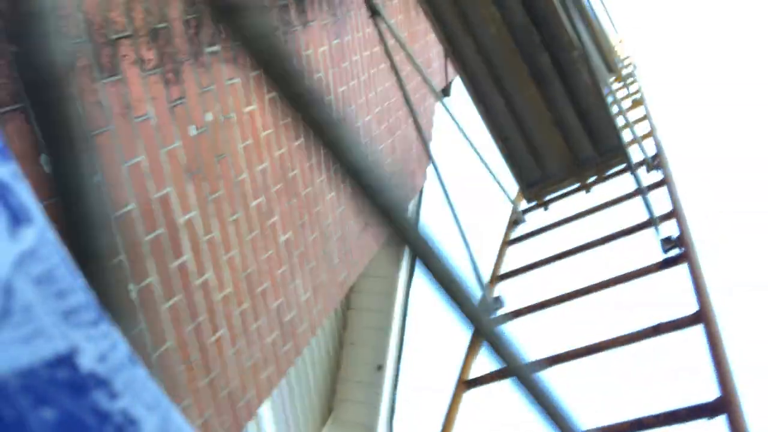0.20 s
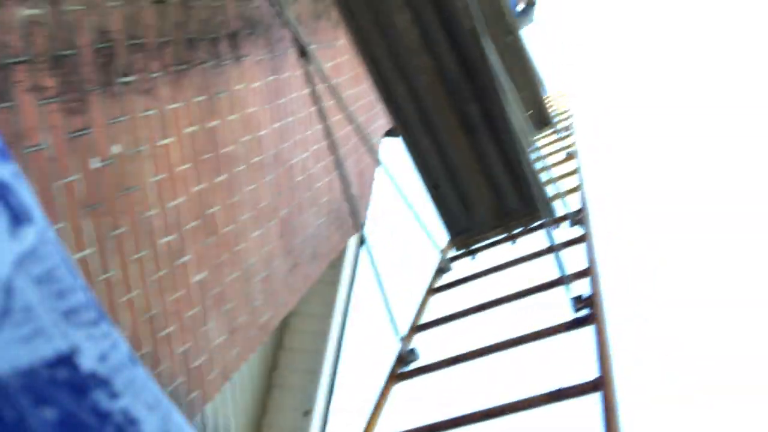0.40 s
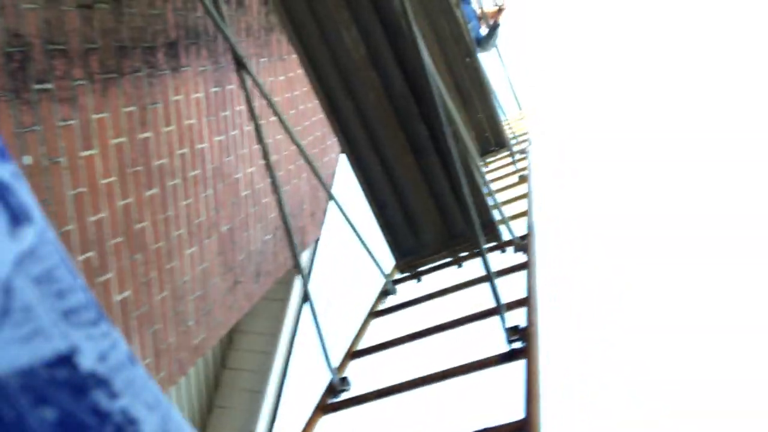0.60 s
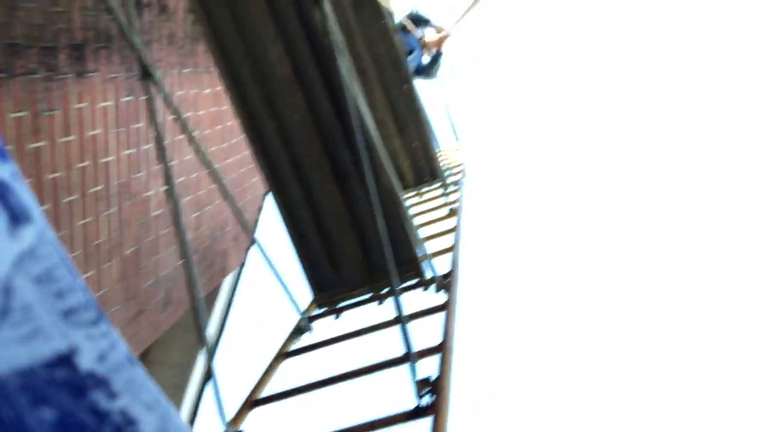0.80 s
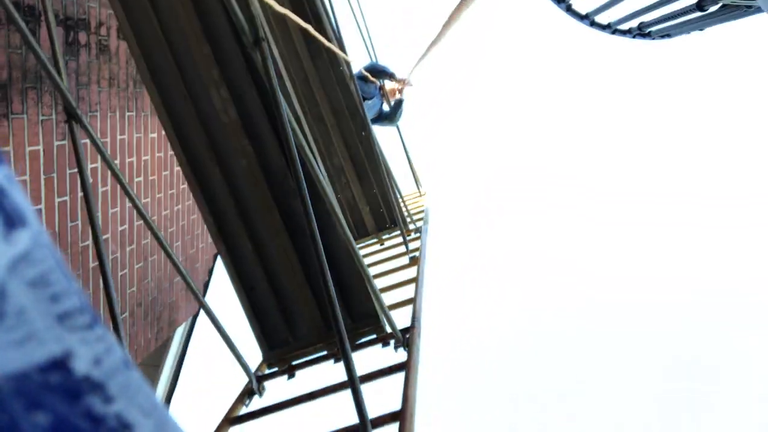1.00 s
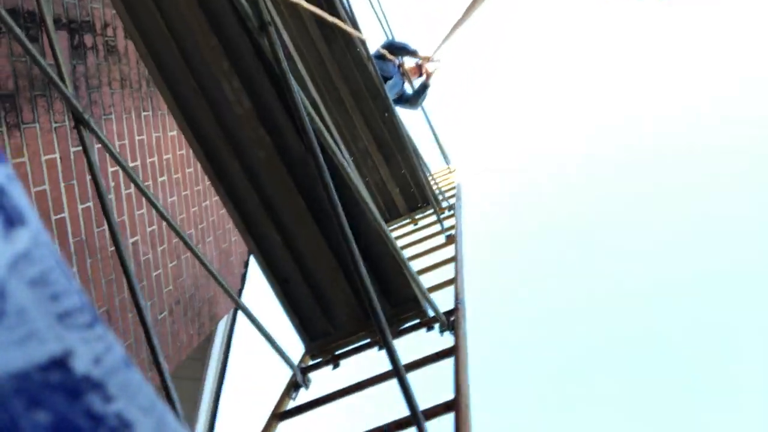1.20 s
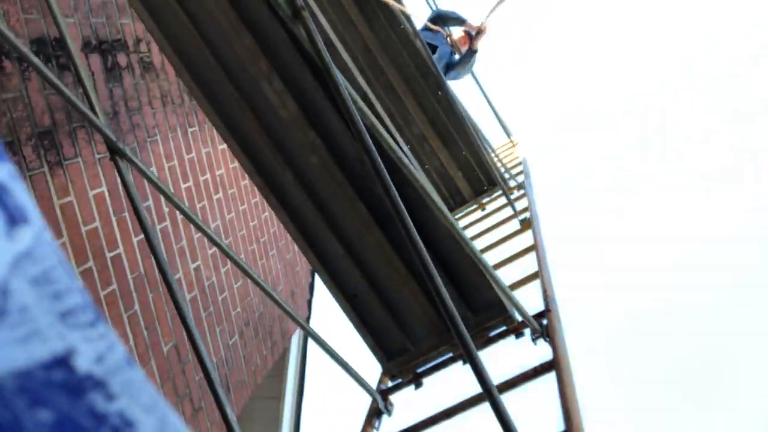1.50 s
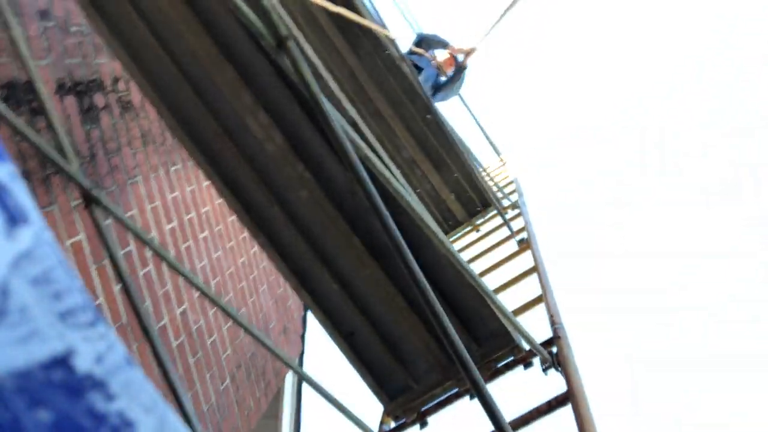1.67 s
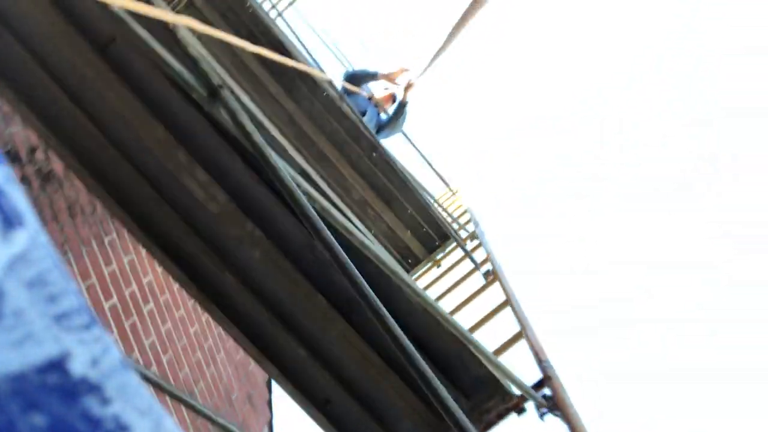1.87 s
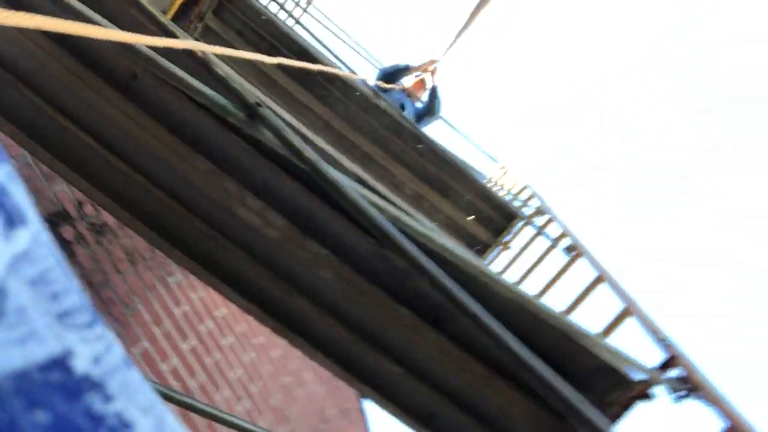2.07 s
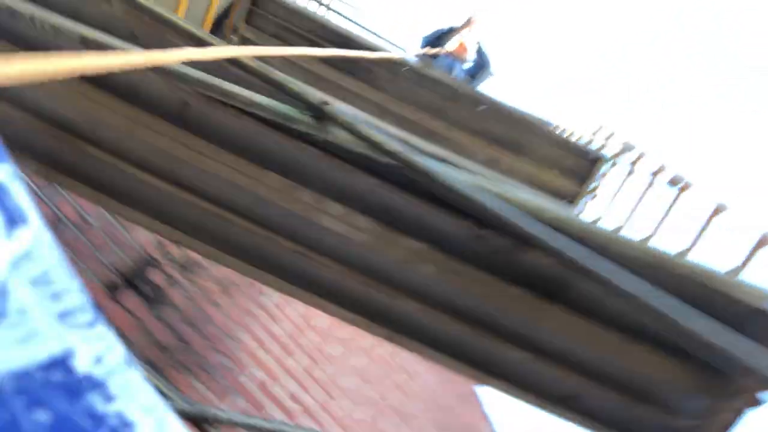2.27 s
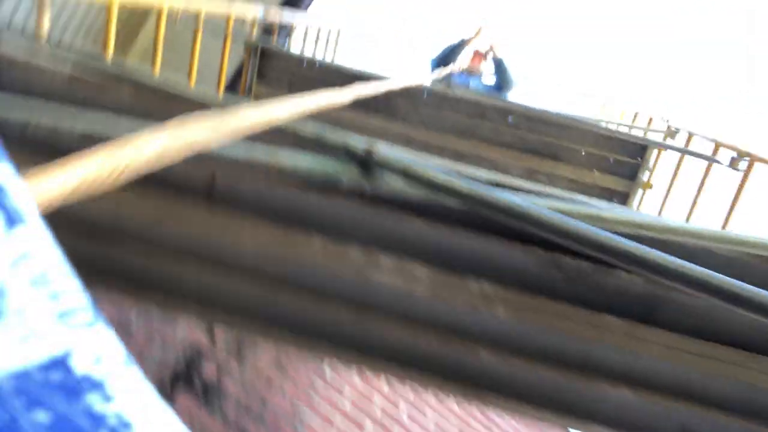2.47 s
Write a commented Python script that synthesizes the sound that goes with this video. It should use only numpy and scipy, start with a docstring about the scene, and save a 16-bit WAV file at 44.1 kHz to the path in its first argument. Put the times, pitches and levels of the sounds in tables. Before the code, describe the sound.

A bucket of tools takes one hard hollow knock, then light clacks and scrapes as it is hauled up

```python
"""Inside a bucket of tools, hauled up on a rope beside a brick wall and a steel scaffold.
The bucket takes one hard knock and a few light ones, and a loose tool knocks: blows excite decaying modes.
The tool also drags and cloth rustles, with a short scrape and narrow ringing bands: filtered random grains.
The swinging load thuds softly and distant traffic rumbles below: both are noise shaped in spectrum."""
import sys
import numpy as np
from scipy import signal
from scipy.fft import rfft, irfft
from scipy.io import wavfile

SR = 44100
rng = np.random.default_rng(int(sys.argv[2]) if len(sys.argv) > 2 else 0)


def persist_wave(psi):
    """Save psi, clipped to +-1, as 16-bit WAV."""
    counts = np.round(np.clip(psi, -1, 1) * 32767).astype(np.int16)
    wavfile.write(sys.argv[1], SR, np.atleast_2d(counts).T)


N = 114660  # samples

# Street rumble and hiss, relative spectrum: (f/Hz, level/dB)
STREET_SPECTRUM = [(18, -33), (30, -5.5), (165, -8), (295, -7), (355, -10.5), (632, -13), (801, -10),
                   (962, -15), (1670, -24), (3220, -30), (3670, -30.5), (5900, -33.5), (16000, -39.5)]
# Low thudding of the swinging load, before its flutter: (t/s, level/dB)
SWAY_LEVEL = [(0, -65.5), (.3, -54), (.46, -71), (.62, -61), (.8, -56), (.95, -56), (1.2, -56), (1.4, -55),
              (1.55, -57.5), (1.67, -55), (1.73, -44), (1.83, -42.5), (1.9, -52.5), (2.0, -52.5),
              (2.16, -58), (2.23, -52), (2.33, -51), (2.45, -55.5), (2.6, -59)]
# Relative spectrum of the thudding: (f/Hz, level/dB)
SWAY_SPECTRUM = [(18, -56), (30, -64.5), (43, 7), (86, 2.5), (200, -6.5), (322, -21), (400, -14.5),
                 (520, -37.5), (880, -120)]
# Swishes, with a short scrape and narrow ringing bands among them, level before the swell:
# (centre t/s, half-length/s, level/dB, centre f/Hz, width/octaves)
SWISHES = [(0.44, 0.037, -62.5, 3400, 2), (0.43, .04, -72, 12000, 0.71), (.545, 0.034, -64.5, 5000, 1.1),
           (0.582, 0.027, -57, 7500, 4.3), (0.62, 0.068, -61.5, 11200, 7), (0.72, 0.037, -69, 4200, 1.7),
           (0.76, 0.095, -67, 13000, 4.4), (0.935, 0.12, -79, 5000, 1.5), (1.014, 0.042, -61, 6200, 1.6),
           (1.021, 0.019, -67, 6200, 0.088), (1.018, 0.022, -64.5, 12000, 0.25),
           (1.018, .014, -70, 15000, .12), (1.789, 0.042, -65, 5700, 0.74), (1.895, 0.088, -65, 10000, 6.4),
           (2.2, 0.1, -67, 5500, 2.1), (2.06, 0.11, -58, 2000, 1.68), (0.38, 0.19, -55.5, 358, 0.23),
           (0.58, .022, -52.5, 590, 0.091), (2.058, 0.019, -48.5, 1350, 0.41),
           (0.92, 0.013, -60.5, 3200, .7)]
# Things shifting and dragging in the bucket: (t/s, level/dB)
DRAG_LEVEL = [(0.0, -71), (0.22, -59), (0.36, -54), (0.58, -62), (1.05, -59.5), (1.22, -66), (1.53, -78.5),
              (1.74, -52), (1.85, -56), (1.93, -52), (2.01, -57.5), (2.1, -56), (2.2, -55.5), (2.36, -71),
              (2.52, -87), (2.6, -70)]
# Relative spectrum of the rubbing: (f/Hz, level/dB)
DRAG_SPECTRUM = [(150, -56), (250, -3.5), (340, -2), (538, -0.5), (561, -5.5), (877, -4), (1140, -5),
                 (7000, -34.5), (9100, -48), (15400, -120)]
# Bright ticks of hard contact, level before the puff and snap offsets: (t/s, level/dB)
TICKS = [(0.2039, -34.5), (0.208, -45), (0.334, -54.5), (0.4259, -60), (0.4732, -49), (0.5399, -61),
         (0.7669, -81), (0.7814, -47), (1.0357, -52), (1.0899, -43.5), (1.148, -48), (1.1817, -53),
         (1.6753, -39), (1.6857, -40), (1.912, -48.5), (2.21, -57), (2.397, -58), (2.436, -52),
         (2.5202, -54)]
# Knocks of the loose tool, nominal time and level before the touch offsets:
# (t/s, level/dB, bass/dB, treble/dB, top/dB, share of the free ring time)
TOOL_KNOCKS = [(0.3329, -42.5, -7, 3.5, 5, 0.49), (0.395, -44.5, -15, 4, 3, 0.62),
               (0.4281, -44.5, 0, 0, 3, 0.91), (0.636, -44, 2, 0.5, -2, 0.43),
               (0.9796, -44.5, -1, -2.5, -4, 0.66), (1.0559, -43.5, -0.5, -5, -1, 0.61),
               (1.0915, -36, 3, 3.5, -3, 0.5), (1.1435, -33.5, 4, -5.5, -8, 0.43),
               (1.162, -46, -3, -18, -10, 0.67), (1.185, -39.5, -2.5, -5, -15, 0.89),
               (1.3836, -44.5, 1.5, 3, -10, 0.65), (1.446, -46, -2, -3, -16, 0.84),
               (1.4852, -41.5, -2, -1, -9, 0.74), (1.5105, -48, 7.5, 3, -9, 0.63),
               (1.6333, -41, 1, 1.5, 1, 1.14), (1.6772, -34, -13, 6, 8, 0.47),
               (1.6825, -26, 4.5, 11.5, 13, 0.48), (1.6915, -31.5, 3.5, -12, -12, 0.58),
               (1.886, -32.5, -10, -12, 0, 0.29), (1.9155, -32, -2, -6, -2, 0.58),
               (1.922, -31.5, -11, -13, -2, 0.82), (1.944, -41, -13, 2.5, -2, 0.66),
               (1.9851, -33, -6, -7, -4, 0.73), (2.088, -45, -23, -15, -10, 0.78),
               (2.139, -43, -6, -3.5, 0, 0.93), (2.1668, -42.5, -9, -6, -6, 0.97),
               (2.2144, -42.5, -2, -1, -1, 0.61), (2.2258, -33, 3.5, 7, 4.5, 0.61),
               (2.3065, -42, 9.5, -6, -10, 0.78), (2.3984, -38.5, -6, 5, -1, 0.65),
               (2.4343, -36.5, -2.5, -3.5, -1.5, 1.015), (2.5223, -43.5, 6, 3.5, -4.5, 0.73),
               (2.583, -43.5, -1, 3.5, 1.5, 0.92)]
# Modes of the tool before detuning: (f/Hz, level/dB, T60/s)
TOOL_MODES = [(380, -6, 0.033), (545.3, -4.5, 0.091), (718, -15.5, 0.099), (960, -6, 0.077),
              (1197, -7.5, 0.1), (1632, -8, .07), (1795, 0, 0.024), (2143, 0, 0.022), (2284, -7.5, 0.052),
              (2810, -20.5, 0.081), (2978, -32.5, 0.12), (3680, -14.5, 0.042), (4670, -38.5, 0.005)]
# Unpitched part of a tool knock, relative spectrum: (f/Hz, level/dB)
CLATTER_SPECTRUM = [(180, -45), (300, -17.5), (529, 4.5), (828, -16), (1200, 0), (2340, -15), (7000, -51.5),
                    (9100, -76), (15400, -120)]
# The load thumping on the bucket floor: (t/s, level/dB, bass/dB)
THUMPS = [(.2060, -17.5, -7.5), (0.2117, -22, 5.5), (0.223, -15.5, -2.5), (0.231, -27, 2),
          (0.741, -41, -25)]
# Modes of the bucket floor: (f/Hz, level/dB, T60/s)
FLOOR_MODES = [(61, -4, 0.11), (94.3, 0.5, 0.097), (135.5, -4.5, 0.097), (194.5, -4, 0.092),
               (249.2, -3, 0.099), (315, -32.5, 0.082), (426, -8, 0.056)]
# Knocks choked at once by what presses on the wall: (t/s, length/s, peak level/dB, f/Hz)
CHOKED_KNOCKS = [(.2060, .0056, -6, 735), (1.1468, .005, -31.5, 1050)]
# Knocks on the bucket wall, the hard one led by a faint low onset:
# (t/s, level/dB, bass/dB, treble/dB, top/dB, share of the free ring time)
BUCKET_KNOCKS = [(0.1968, -34, 13, -16, -12, 1.1), (.2030, -23, -9, 14.5, 14, 0.69),
                 (0.2058, -17, -1.5, 16, 7, 0.56), (.2190, -17, -2, -11, -7.5, 1.18),
                 (0.4722, -45.5, -34, 7, 10, 1), (0.5461, -51.5, -3, 1, 8, 1.2),
                 (.7370, -38.5, -1.5, -30, -13, 1.55), (0.7846, -58.5, -22, 9, 22.5, 0.8),
                 (2.446, -39.5, -23, -8, -9, 0.8)]
# Modes of the bucket wall: (f/Hz, level/dB, T60/s)
BUCKET_MODES = [(636, -8, 0.063), (716, 0, 0.046), (1070, -18.5, 0.037), (1138, 1.5, 0.096),
                (1217, -13.5, 0.19), (1458, -12, 0.058), (2323, -10.5, 0.019), (2924, -21, 0.045),
                (3845, -26, 0.089), (4860, -32, .08), (5020, -27, 0.062), (7270, -35.5, 0.05)]
# Loose contents jolted by a bucket knock, relative spectrum: (f/Hz, level/dB)
CRASH_SPECTRUM = [(900, -3.5), (1500, 6), (2400, -6), (3800, -9.5), (5500, -18.5), (9000, -24),
                  (16000, -26.5)]

STREET_DB, HUM_HZ, HUM_T60_S, HUM_DB = -59.5, 150.9, 0.66, -66.5
TAIL_T60_S, TAIL_DB, TAIL_CUT_HZ = 0.22, -21.5, 8200  # scatter from wall and scaffold
RUSTLE_GRAINS_PER_S = 3500
DRAG_GRAINS_PER_S, DRAG_RING_DB = 1300, -13
TICK_T60_S, TICK_LOW_HZ, TICK_HIGH_HZ = 0.0124, 6250, 12500
TICK_PUFF_DB, TICK_SNAP_DB, SNAP_LOW_HZ = -3, 11, 2800
RISE_S = .0006  # time constant of contact softness
KNOCK_KNEES_HZ = [600, 1150, 2250, 3700]  # where bass, middle, treble and top apply in full
# Each tool knock is a short run of touches; each mode's pitch varies a little at random between knocks.
TOOL_DB, TOUCHES, SPREAD_DB, DETUNE = -10, 3, 3, 0.0087  # detune: standard deviation, share of f
CONTACT_S, LEAD_S = .007, .002
SWELL_DB = 9  # extra level of the middle touch
TOOL_RISE_CYCLES = 1.57  # low modes of the tool speak later
CLATTER_DB, CLATTER_T60_S = -12.5, 0.065
CRASH_GRAINS_PER_S, CRASH_DB, CRASH_T60_S = 8900, -22.5, 0.077
LOW_CUT_HZ, CUTOFF_HZ = 53.6, 15900


def amp(db):
    """Decibel law: 20 dB is a factor of ten in amplitude."""
    return 10 ** (np.asarray(db) / 20)


def rms_one(x):
    """Normalisation: dividing by the root mean square gives unit power."""
    return x / np.sqrt(np.mean(x ** 2) + 1e-20)


def in_time(rows):
    """Amplitude envelope: gain follows a (t/s, level/dB) curve, linear in dB."""
    s, db = np.transpose(rows)
    return amp(np.interp(np.arange(N) / SR, s, db))


def colour(x, spectrum):
    """Spectral shaping: each Fourier component is weighted by a (f/Hz, level/dB) curve; rms 1."""
    hz, db = np.transpose(spectrum)
    log_f = np.log(np.arange(N // 2 + 1) * SR / N + 1)
    # 30 dB lower one octave outside the curve
    log_hz = np.log(np.r_[hz[0] / 2, hz, hz[-1] * 2])
    db = np.r_[db[0] - 30, db, db[-1] - 30]
    gain = amp(np.interp(log_f, log_hz, db))
    return rms_one(irfft(rfft(x) * gain, N))


def flutter(rate_hz, depth_db):
    """Amplitude modulation: low-passed noise, drawn at 200 Hz, varies the gain in dB."""
    count = int(N / SR * 200) + 2
    r = np.exp(-2 * np.pi * rate_hz / 200)
    noise = rng.standard_normal(count + 400)
    slow = signal.lfilter([1], [1, -2 * r, r * r], noise)[400:]  # settled part only
    return amp(depth_db * np.interp(np.arange(N) * 200 / SR, np.arange(count), rms_one(slow)))


def grains(rate_per_s, spread_db):
    """Shot noise: clicks of random size and sign at random times; rms 1."""
    sizes = amp(spread_db * np.minimum(rng.exponential(1, N), 4))
    signs = rng.choice([-1, 1], N)
    happens = rng.random(N) < rate_per_s / SR
    return rms_one(sizes * signs * happens)


def ring(clicks, hz, t60):
    """Damped resonance: a unit click starts a decaying sine of initial height near 1."""
    r, w = amp(-60 / (t60 * SR)), 2 * np.pi * hz / SR
    return signal.lfilter([0, np.sin(w)], [1, -2 * r * np.cos(w), r * r], clicks + 1e-18)


def band_pass(x, low_hz, high_hz):
    """Band limitation: components outside the two edges are attenuated."""
    sos = signal.butter(2, [low_hz, high_hz], "band", fs=SR, output="sos")
    return signal.sosfilt(sos, x)


def dying(s, db, t60):
    """Exponential decay: each start gives a quick rise and then a fall of 60 dB per T60."""
    starts = np.zeros(N)
    starts[(np.asarray(s) * SR).astype(int)] = amp(db)
    soft = np.exp(-1 / (RISE_S * SR))
    decay = amp(-60 / (t60 * SR))
    return signal.lfilter([1 - soft], np.convolve([1, -soft], [1, -decay]), starts + 1e-18)


def strike(modes, s, db, tone_db, ring_share, chance_db, detune, knees_hz, rise_cycles=0):
    """Modal superposition: a blow excites every mode, weighted by the tone of that blow."""
    hz, mode_db, t60 = np.transpose(modes)
    out = np.zeros(N + SR)
    t = np.arange(SR // 7)[:, None] / SR  # each ring is summed for 1/7 s
    rise = RISE_S + rise_cycles / hz
    for k, start in enumerate((s * SR).astype(int)):
        tone = np.interp(np.log(hz), np.log(knees_hz), tone_db[:, k])
        gain = amp(db[k] + mode_db + tone + chance_db[k])
        damped_t60 = t60 * np.clip(ring_share[k], .15, 1.5)
        shape = (1 - np.exp(-t / rise)) * amp(-60 * t / damped_t60)
        waves = np.sin(2 * np.pi * hz * (1 + detune[k]) * t)
        out[start:start + len(t)] += (shape * waves) @ gain
    return out[:N]


def street():
    """Broadband noise and narrow-band resonance: steady rumble and hiss with a faint wavering hum."""
    hum = rms_one(ring(rng.standard_normal(N), HUM_HZ, HUM_T60_S))
    air = colour(rng.standard_normal(N), STREET_SPECTRUM)
    return amp(STREET_DB) * air + amp(HUM_DB) * hum


def surroundings(x):
    """Diffuse scattering: convolution with decaying noise adds a short dull tail."""
    t = np.arange(SR // 2) / SR
    noise = signal.lfilter(*signal.butter(1, TAIL_CUT_HZ, fs=SR), rng.standard_normal(len(t)))
    tail = noise * amp(-60 * t / TAIL_T60_S)
    unit_tail = tail / np.sqrt(np.sum(tail ** 2))
    return amp(TAIL_DB) * signal.fftconvolve(x, unit_tail)[:N]


def sway():
    """Modulated low noise: an uneven envelope makes the swinging load thud softly."""
    low_noise = colour(rng.standard_normal(N), SWAY_SPECTRUM)
    return in_time(SWAY_LEVEL) * low_noise * flutter(20.0, depth_db=1.5)


def rustle():
    """Band-limited shot noise: fine grains swell and fade; wide bands swish, narrow ones scrape or ring."""
    fine, out = grains(RUSTLE_GRAINS_PER_S, spread_db=2.5), np.zeros(N)
    for s, half_length, db, hz, octaves in SWISHES:
        size = int(2 * half_length * SR)
        start = int((s - half_length) * SR)
        low, high = np.minimum(hz * 2 ** (np.array([-.5, .5]) * octaves), .45 * SR)
        band = band_pass(fine[start:start + size], low, high)
        out[start:start + size] += amp(db) * rms_one(band) * np.hanning(size)
    return out


def drag():
    """Friction excitation: dense grains of rubbing are heard directly and through the tool's modes."""
    rub = grains(DRAG_GRAINS_PER_S, spread_db=0.75) * flutter(35.35, depth_db=1.5)
    rung = np.zeros(N)
    for k, (hz, db, t60) in enumerate(TOOL_MODES):
        rung += (-1) ** k * amp(db) * ring(rub, hz, t60)  # alternate modes in opposite phase
    mixed = colour(rub, DRAG_SPECTRUM) + amp(DRAG_RING_DB) * rms_one(rung)
    return in_time(DRAG_LEVEL) * rms_one(mixed)


def ticks():
    """Impulsive contact: a broad snap and a short bright puff of noise."""
    s, db = np.transpose(TICKS)
    puffs = dying(s, db + TICK_PUFF_DB, TICK_T60_S) * rng.standard_normal(N)
    snaps = np.zeros(N)
    snaps[(s * SR).astype(int) + 20] = amp(db + TICK_SNAP_DB)  # 20 samples after the puff starts
    bright_puffs = band_pass(puffs + 1e-18, TICK_LOW_HZ, TICK_HIGH_HZ)
    return bright_puffs + band_pass(snaps + 1e-18, SNAP_LOW_HZ, TICK_HIGH_HZ)


def tool():
    """Repeated impact: each knock is a few uneven touches that ring the modes, with a dry clatter."""
    s, db, bass, treble, top, share = np.repeat(TOOL_KNOCKS, TOUCHES, axis=0).T
    touch = np.arange(len(s)) % TOUCHES
    delay_draw = rng.standard_normal(len(s))
    chance_db = SPREAD_DB * rng.standard_normal((len(s), len(TOOL_MODES)))
    # the touches of one knock share their pitches
    knock_detune = DETUNE * rng.standard_normal((len(TOOL_KNOCKS), len(TOOL_MODES)))
    detune = np.repeat(knock_detune, TOUCHES, axis=0)
    step = (touch + .25 * np.minimum(np.abs(delay_draw), 3)) / TOUCHES
    s = s + step * CONTACT_S - LEAD_S
    db = db + TOOL_DB + SWELL_DB * (touch == 1)
    noise = colour(rng.standard_normal(N), CLATTER_SPECTRUM)
    clatter = dying(s, db + CLATTER_DB, CLATTER_T60_S) * noise
    tone = np.array([bass, 0 * s, treble, top])
    rung = strike(TOOL_MODES, s, db, tone, share, chance_db, detune, KNOCK_KNEES_HZ, TOOL_RISE_CYCLES)
    return rung + clatter


def thumps():
    """Low-frequency modal response: the load's dull blows ring the bucket floor."""
    s, db, bass = np.transpose(THUMPS)
    tone = np.array([bass, 0 * s])
    return strike(FLOOR_MODES, s, db, tone, 1 + 0 * s, 0 * s, 0 * s, [100, 250])


def choked():
    """Heavy damping: a few cycles swell and are cut off."""
    out = np.zeros(N)
    for s, length, db, hz in CHOKED_KNOCKS:
        t = np.arange(int(length * SR)) / SR
        swell = np.sin(np.pi * (t / length) ** 1.4) ** .6
        start = int(s * SR)
        out[start:start + len(t)] += amp(db) * swell * np.sin(2 * np.pi * hz * t)
    return out


def bucket():
    """Modal response to impact: knocks, the hard one after a faint low onset, ring the wall and contents."""
    s, db, bass, treble, top, share = np.transpose(BUCKET_KNOCKS)
    jolted = colour(grains(CRASH_GRAINS_PER_S, spread_db=1.5), CRASH_SPECTRUM)
    crash = dying(s, db + top + CRASH_DB, CRASH_T60_S) * jolted
    tone = np.array([bass, 0 * s, treble, top])
    return strike(BUCKET_MODES, s, db, tone, share, 0 * s, 0 * s, KNOCK_KNEES_HZ) + crash


def scene():
    """Linear superposition: all sources add in one channel; only the hits get a scattered tail."""
    hits = ticks() + tool() + thumps() + choked() + bucket()
    background = street() + sway() + rustle() + drag()
    return (background + surroundings(hits) + hits)[None]


def record(dry):
    """Band-limited reception: the microphone drops the deep bass; the top is cut."""
    thin = signal.sosfilt(signal.butter(4, LOW_CUT_HZ, "high", fs=SR, output="sos"), dry)
    top_cut = signal.cheby2(14, 60, CUTOFF_HZ + 350, fs=SR, output="sos")  # stop-band edge
    return signal.sosfilt(top_cut, thin)


dry = scene()
out = record(dry)
persist_wave(out)
```